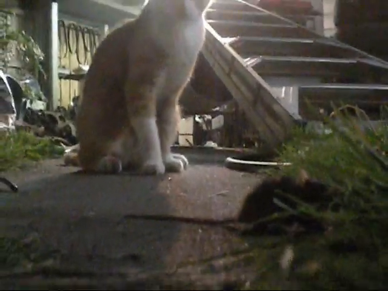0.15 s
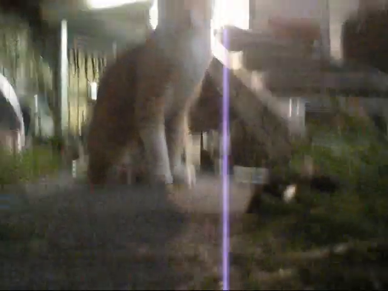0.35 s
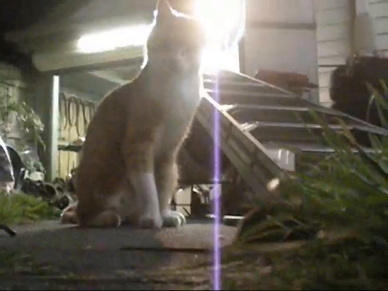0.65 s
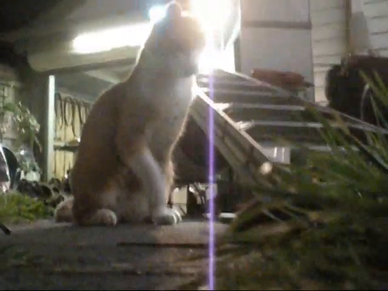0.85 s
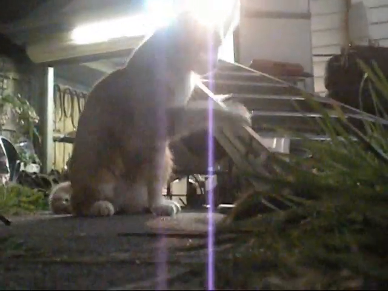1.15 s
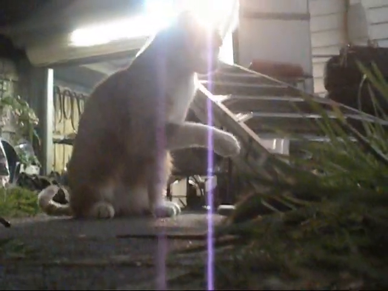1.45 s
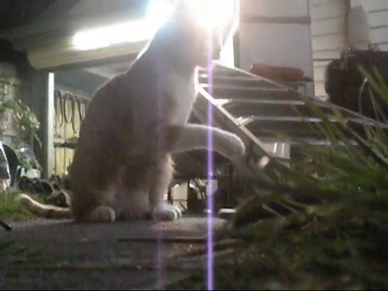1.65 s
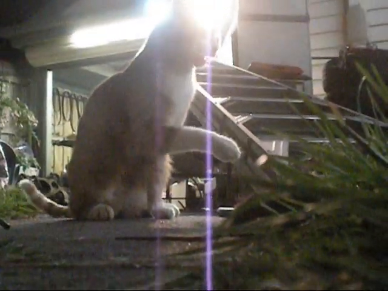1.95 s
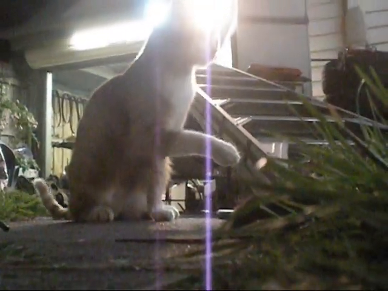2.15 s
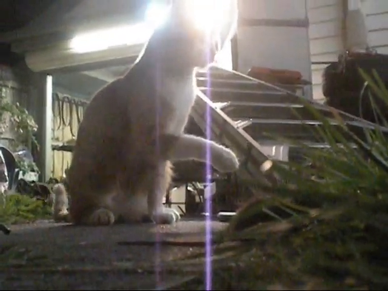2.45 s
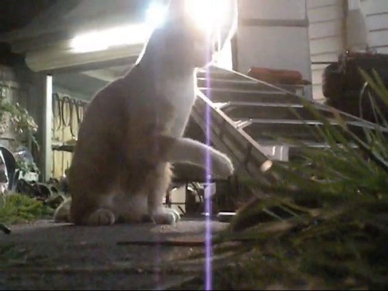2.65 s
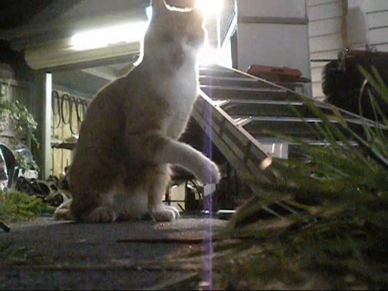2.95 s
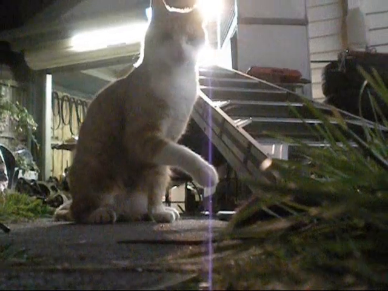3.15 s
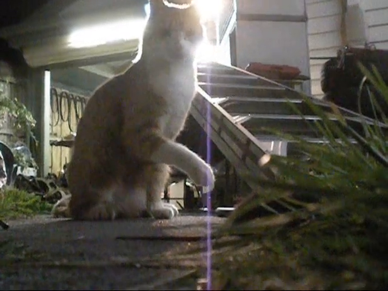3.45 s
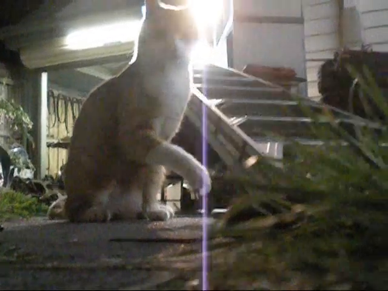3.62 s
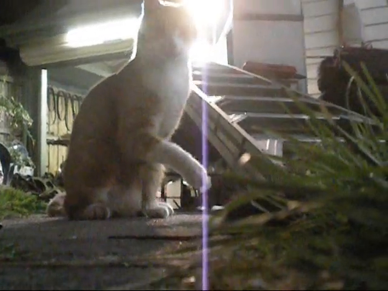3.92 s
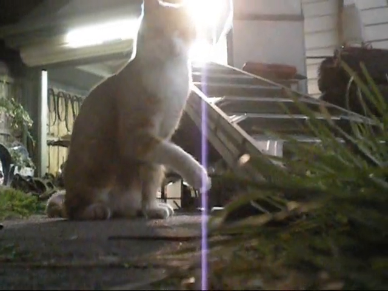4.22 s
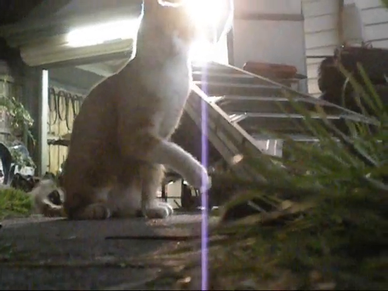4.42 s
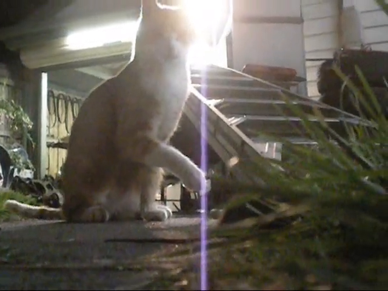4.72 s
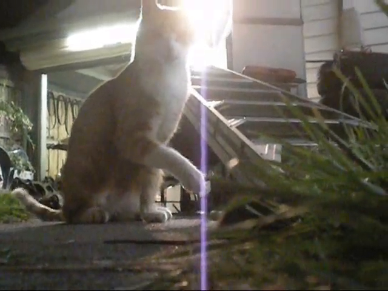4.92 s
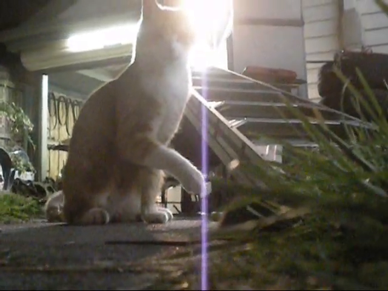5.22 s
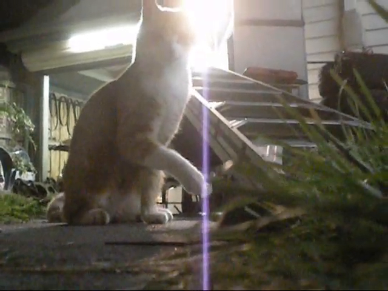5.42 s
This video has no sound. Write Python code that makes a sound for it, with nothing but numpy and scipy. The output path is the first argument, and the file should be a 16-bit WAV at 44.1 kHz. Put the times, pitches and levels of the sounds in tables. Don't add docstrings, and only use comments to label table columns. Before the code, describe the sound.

At night in a yard, a small animal scrabbles in grass right by a cheap microphone on the ground. A faint click and scrape come first, then a loud hollow plastic knock with snaps at one second. Sparse ticks follow, then stronger scratchy sweeps near four seconds and a hard crackling cluster, ending with one light rustle. Dull distant hum runs beneath, in coarse, grainy low-quality sound.

```python
import sys
import numpy as np
from scipy import signal
from scipy.fft import rfft, irfft
from scipy.io import wavfile
from scipy.ndimage import uniform_filter1d

SR = 44100
rng = np.random.default_rng(int(sys.argv[2]) if len(sys.argv) > 2 else 0)


def put_to_file(sound):
    columns = np.atleast_2d(sound).T
    safe = np.clip(columns, -1, 1)
    whole_steps = np.round(safe * 32767)
    wavfile.write(sys.argv[1], SR, whole_steps.astype(np.int16))


def linear_from_db(decibels):
    return 10 ** (np.asarray(decibels, float) / 20)


N = 246078


def evened(x):
    return x / np.sqrt(np.mean(x ** 2) + 1e-20)


def add(mix, start_s, sound):
    part = mix[round(start_s * SR):][:len(sound)]
    part += sound[:len(part)]


def colour(x, points):
    f_hz, level_db = np.transpose(points)
    hz = np.fft.rfftfreq(len(x), 1 / SR)
    gain_db = np.interp(np.log(hz + 1), np.log(f_hz + 1), level_db)
    return irfft(rfft(x) * linear_from_db(gain_db), len(x))


def resonate(x, hz, width_hz):
    turn = np.exp(2j * np.pi * np.cumsum(hz * np.ones(len(x))) / SR)
    r = np.exp(-np.pi * width_hz / SR)
    smooth = signal.lfilter([1 - r], [1, -r], x / turn + 1e-18)
    return 2 * (turn * smooth).real


def resonate_twice(x, hz, width_hz):
    return evened(resonate(resonate(x, hz, width_hz), hz, width_hz))


def drift(count):
    noise = rng.standard_normal(N)
    return evened(uniform_filter1d(uniform_filter1d(noise, count), count))


SLIPS_PER_S, SLIP_SPREAD_DB, CLUMP_DB = 7500, 3, 2.2


def slips():
    uneven_db = SLIP_SPREAD_DB * np.minimum(rng.exponential(1, N), 5)
    size = linear_from_db(uneven_db + CLUMP_DB * drift(count=130))
    happens = rng.random(N) < SLIPS_PER_S / SR
    return size * rng.standard_normal(N) * happens


# f/Hz, level/dB
BLADE_COLOUR = [(240, -39), (400, -8.5), (682, 2), (916, -8), (1100, -10), (1790, 1.5), (2420, -4),
                (3900, -6.5), (5070, -38.5), (8580, -120)]
TURF_HZ, TURF_WIDTH_HZ = 408, 320
EDGE_DB, RISE_POWER, FALL_POWER = -21, 2.17, 2.6
BEND = 0.1
TIPS_FOLLOW_DB_PER_DB = 0.17


def scrape(top_s, top_db, rise_s, fall_s, centre_hz, turf_db, tips_db, drives):
    start_s = top_s - rise_s
    drives = drives[:, round(start_s * SR):round((top_s + fall_s) * SR)]
    t = np.arange(drives.shape[1]) / SR
    rising = t < rise_s
    away = np.where(rising, 1 - t / rise_s, (t - rise_s) / fall_s)
    stroke_db = top_db + EDGE_DB * abs(away) ** np.where(rising, RISE_POWER, FALL_POWER)
    tips_db = tips_db + TIPS_FOLLOW_DB_PER_DB * (stroke_db - top_db)
    ring_hz = centre_hz * (1 + BEND * (t / (rise_s + fall_s) - 0.5))

    rub = linear_from_db(tips_db + 8) * evened(colour(drives[0], BLADE_COLOUR))
    blades = rub + 1.026 * resonate_twice(drives[1], ring_hz, 750)
    tips = linear_from_db(tips_db - 4.5) * resonate_twice(drives[2], 3000, 1500)
    turf = linear_from_db(turf_db - 9) * resonate_twice(drives[3], TURF_HZ, TURF_WIDTH_HZ)
    fade = np.clip(np.minimum(t, rise_s + fall_s - t) / 0.0015, 0, 1)
    return start_s, linear_from_db(stroke_db - 1) * (blades / 1.51 + tips + turf) * np.sqrt(fade)


# top t/s, level/dB, rise t/s, fall t/s, centre f/Hz
PRESSES = [(0.886, -36, 0.031, 0.062, 640), (1.098, -27.5, 0.029, .035, 554),
           (2.565, -36.5, 0.026, .03, 560), (0.98, -32, 0.042, 0.0075, 830),
           (0.999, -33.5, 0.0035, 0.014, 854), (1.06, -33.5, 0.046, .025, 833),
           (1.105, -19.5, 0.031, 0.04, 1065), (2.569, -31.5, 0.06, 0.073, 1044),
           (3.803, -29, 0.025, 0.016, 720), (4.612, -25.5, .025, 0.035, 895),
           (4.639, -19.5, 0.012, 0.024, 1150), (4.09, -37, 0.018, 0.021, 796),
           (4.669, -23.5, .03, 0.022, 965)]


def press_down(grass, drives):
    for row in PRESSES:
        add(grass, *scrape(*row, turf_db=1, tips_db=-10.5, drives=drives))


# top t/s, level/dB, rise t/s, fall t/s, centre f/Hz
BRUSHES = [(0.53, -35.5, 0.011, 0.036, 1660), (0.545, -37.5, 0.028, 0.031, 970),
           (0.604, -48, 0.018, .07, 964), (1.156, -41.5, 0.017, 0.056, 1310),
           (1.292, -43, 0.051, 0.038, 1020), (1.342, -39.5, 0.029, 0.021, 1540),
           (1.982, -40.5, 0.037, .03, 843), (2.31, -51.5, 0.033, 0.093, 1060),
           (2.531, -33, 0.054, 0.023, 1080), (2.608, -35, .03, .035, 1370),
           (3.838, -24, 0.077, 0.094, 1202), (4.036, -43.5, 0.017, 0.032, 1080),
           (4.09, -31.5, 0.029, 0.015, 1184), (4.167, -39, 0.031, 0.016, 1650),
           (4.233, -27, 0.071, 0.023, 1680), (4.499, -40.5, 0.018, .02, 1390),
           (4.535, -29, 0.02, 0.0098, 1560), (4.572, -31.5, 0.029, 0.028, 1580),
           (5.51, -50.5, 0.052, 0.055, 953), (5.585, -28, 0.04, 0.0081, 1073)]


def brush(grass, drives):
    other_slips = np.roll(drives, SR // 2, axis=1)
    for row in BRUSHES:
        add(grass, *scrape(*row, turf_db=-10, tips_db=-13.5, drives=other_slips))


# top t/s, level/dB, rise t/s, fall t/s, centre f/Hz
SWEEPS = [
    (0.876, -36, 0.021, 0.069, 1550),
    (3.834, -25.5, 0.067, 0.078, 2220),
    (4.01, -41, 0.0054, 0.073, 1080),
    (4.6, -23.5, 0.015, 0.031, 1120),
    (4.674, -25, 0.073, 0.047, 1114),
    (5.54, -42, 0.014, 0.058, 1130),
    (4.225, -34.5, 0.048, 0.029, 1175),
]


def sweep(grass, drives):
    other_slips = np.roll(drives, SR // 4, axis=1)
    for row in SWEEPS:
        add(grass, *scrape(*row, turf_db=-9, tips_db=-5.5, drives=other_slips))


def snap(start_s, peak_db, ring_hz, start_hz, start_db, t60_s):
    grit = rng.standard_normal(1500)
    t = np.arange(len(grit)) / SR
    early = np.exp(-(t / (0.13 * t60_s)) ** 2)
    glide_hz = ring_hz + (1.12 * start_hz - ring_hz) * early
    tone = np.sin(2 * np.pi * np.cumsum(glide_hz) / SR) + 0.78 * resonate_twice(grit, glide_hz, 1700)
    swell_and_decay = (t / t60_s) ** 1.7 * linear_from_db(-90 * t / t60_s)
    burst = tone * linear_from_db(start_db * early) * swell_and_decay
    return start_s + 0.0002, linear_from_db(peak_db - 1.5) * burst / abs(burst).max()


# t/s, peak level/dB, ring f/Hz, start f/Hz, start level/dB
SNAPS = [(0.563, -35.5, 1660, 3400, 4), (0.8667, -40, 1650, 3380, 8), (0.9826, -6, 2303, 3060, -2.5),
         (0.9893, -11.5, 1610, 2100, 1), (1.0055, -24, 1684, 1565, -6), (1.1145, -13.5, 1484, 2450, -13),
         (1.342, -27.5, 1720, 2230, 0), (1.4175, -15.5, 1450, 3400, 23), (1.578, -32, 1590, 2840, -1),
         (2.4538, -20, 1410, 2630, 13), (3.224, -27, 1704, 2710, -6), (3.7455, -21, 1500, 1640, 1),
         (3.7492, -25, 1040, 1200, 1), (4.2278, -19.5, 1700, 2800, 0), (4.5946, -16, 1590, 2410, 8),
         (4.603, -24, 1390, 2670, 15), (4.6352, -4, 1770, 2230, 2.5), (4.6755, -19, 1280, 2630, 17),
         (4.7256, -27, 1500, 3150, 9), (5.5356, -30.5, 1870, 2400, 2)]


def break_stalks(grass):
    for row in SNAPS:
        add(grass, *snap(*row, t60_s=0.016))


# t/s, peak level/dB, ring f/Hz, start f/Hz
CLICKS = [(0.517, -26.5, 1650, 1700), (2.339, -28.5, 1660, 2900), (2.5709, -21.5, 1290, 2220),
          (2.608, -19.5, 1600, 2230), (3.3076, -25.5, 1630, 2730), (3.7475, -30, 3700, 3350),
          (4.0723, -25, 1170, 1380), (4.2195, -23, 2900, 3320), (4.519, -28, 1650, 2500),
          (4.7268, -18, 2750, 2900), (1.4178, -24, 3000, 3200)]


def click_stems(grass):
    for row in CLICKS:
        add(grass, *snap(*row, start_db=3.5, t60_s=0.0075))


# t/s, peak level/dB
TICKS = [(1.1585, -27.5), (1.3338, -32), (1.685, -31.5), (1.8826, -32.5), (2.4357, -34.5), (2.472, -35),
         (2.486, -31), (2.5275, -37), (2.558, -24), (2.6198, -36), (2.63, -28.5), (2.8618, -32.5),
         (3.236, -33), (3.2438, -34), (3.2566, -37.5), (3.6557, -38.5), (3.9174, -45), (4.008, -30),
         (4.0164, -35), (4.081, -34), (4.194, -25.5), (4.497, -43), (4.5344, -23.5), (4.792, -42),
         (5.1152, -37)]


def tick_blades(grass):
    for row in TICKS:
        add(grass, *snap(*row, ring_hz=1650, start_hz=2450, start_db=3, t60_s=0.011))


# t/s, peak level/dB, ring f/Hz, contact t/s
KNOCKS = [(0.979, -32, 804, 0.0028), (0.9845, 5, 780, 0.0032), (.985, -18, 2640, 0.0032),
          (0.984, -14, 335, 0.0044), (.9888, -9, 736, 0.0032), (0.994, -21, 694, 0.0032),
          (1.0735, -26, 370, 0.013), (1.094, -16, 685, 0.013), (1.108, -15, 410, 0.006),
          (4.636, -19, 1200, 0.0018), (4.637, -15, 359, 0.0094), (4.6365, -16, 720, 0.0049),
          (4.640, -43, 580, 0.0027), (4.643, -7, 854, 0.0019)]


def knock_body(grass):
    for start_s, peak_db, ring_hz, contact_s in KNOCKS:
        t = np.arange(round(contact_s * SR)) / SR
        envelope = np.sin(np.pi * t / contact_s) ** 0.9 * linear_from_db(-5 * t / contact_s)
        add(grass, start_s, -linear_from_db(peak_db) * envelope * np.sin(2 * np.pi * ring_hz * t))


# f/Hz, level/dB per Hz
HUM_COLOUR = [(24, -38), (40, -23.5), (75, -24), (156, -13.5), (182, -10.5), (224, -11), (329, -0.5),
              (431, -7.5), (502, -8.5), (892, -10), (1330, -14.5), (1500, -18.5), (3900, -24),
              (5070, -52.5), (8580, -120)]
HUM_DB, HUM_BREATH_DB = -44, 0.67


def hum():
    level_db = HUM_DB + HUM_BREATH_DB * drift(count=6000)
    return linear_from_db(level_db) * evened(colour(rng.standard_normal(N), HUM_COLOUR))


MIC_LOW_HZ = 149


def scene():
    grass = np.zeros(N)
    drives = np.array([slips() for layer in range(4)])
    press_down(grass, drives)
    brush(grass, drives)
    sweep(grass, drives)
    break_stalks(grass)
    click_stems(grass)
    tick_blades(grass)
    knock_body(grass)
    high_pass = signal.butter(2, MIC_LOW_HZ, "high", fs=SR, output="sos")
    return (hum() + signal.sosfilt(high_pass, grass))[None]


SAMPLES_PER_S, STEPS, ANTI_ALIAS_HZ = 8001.45, 128, 3778


def roll_off(x):
    return signal.sosfilt(signal.butter(12, 15790, fs=SR, output="sos"), x)


def record(dry):
    low_pass = signal.butter(6, ANTI_ALIAS_HZ, fs=SR, output="sos")
    smooth = signal.sosfilt(low_pass, dry)[0]
    held_at = np.floor(np.arange(N) * SAMPLES_PER_S / SR) * SR / SAMPLES_PER_S
    held = np.interp(held_at, np.arange(N), smooth)
    stepped = np.clip(np.floor(held * STEPS), -STEPS, STEPS - 1) / STEPS
    return roll_off(stepped[None])


dry = scene()
out = record(dry)
put_to_file(out)
```